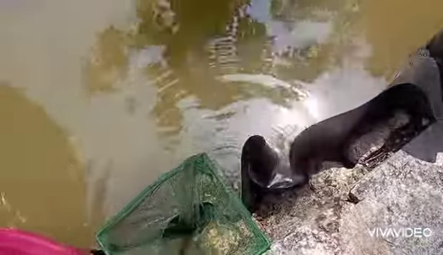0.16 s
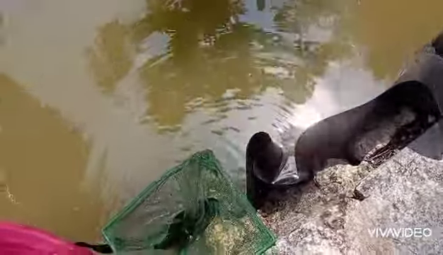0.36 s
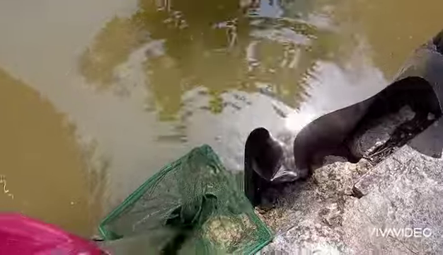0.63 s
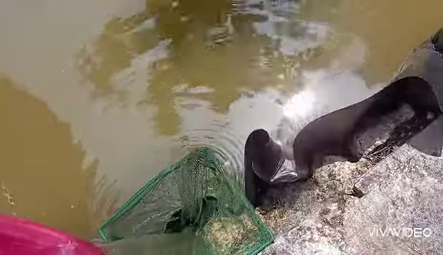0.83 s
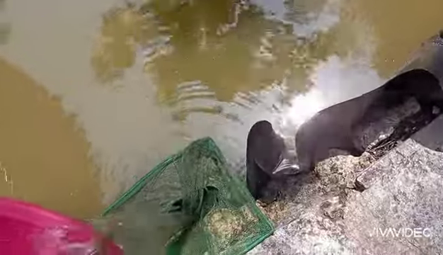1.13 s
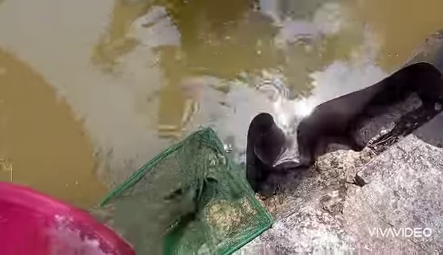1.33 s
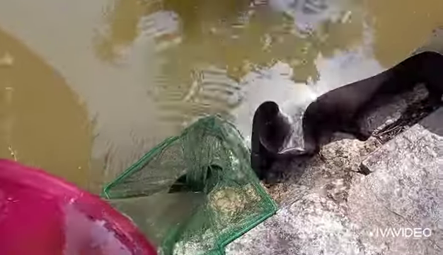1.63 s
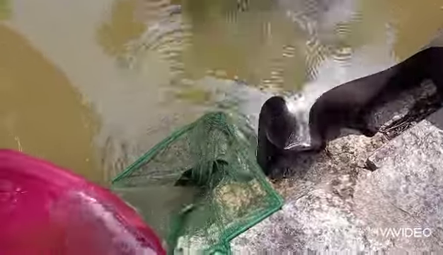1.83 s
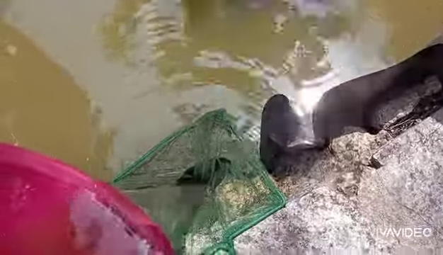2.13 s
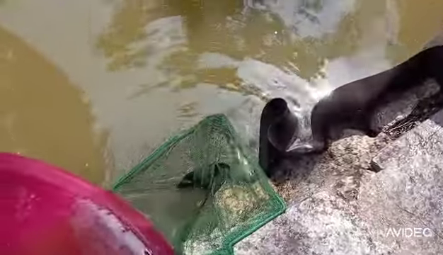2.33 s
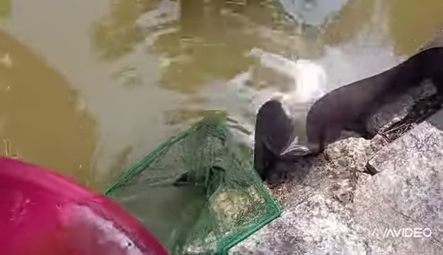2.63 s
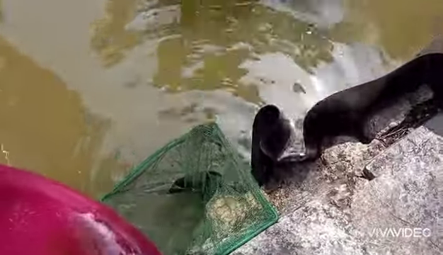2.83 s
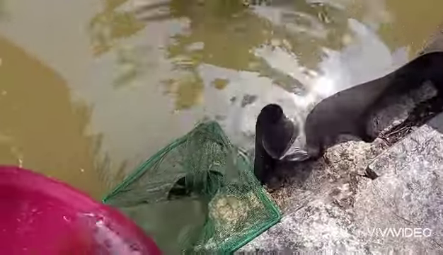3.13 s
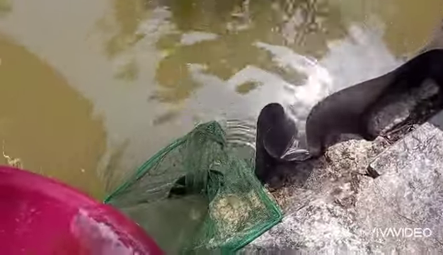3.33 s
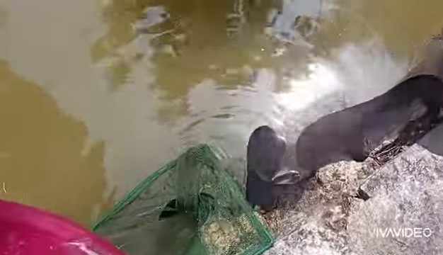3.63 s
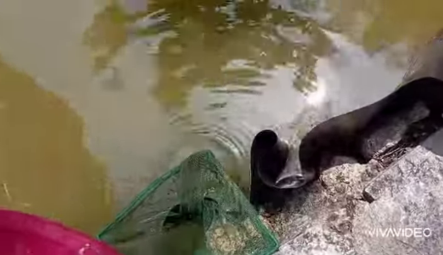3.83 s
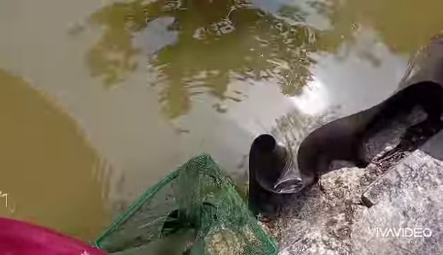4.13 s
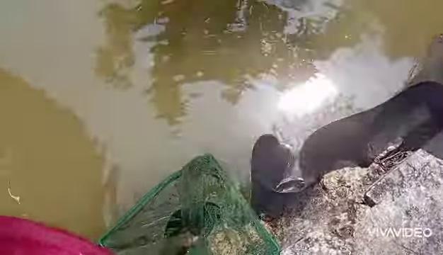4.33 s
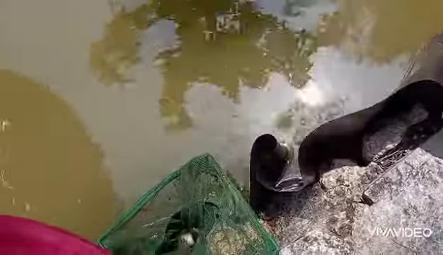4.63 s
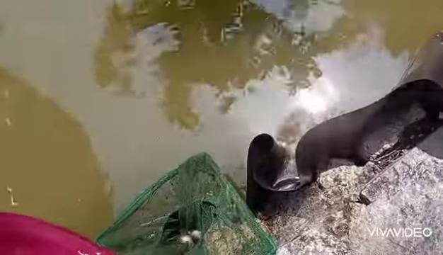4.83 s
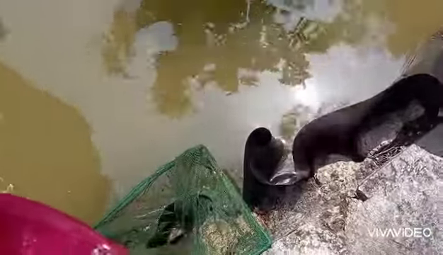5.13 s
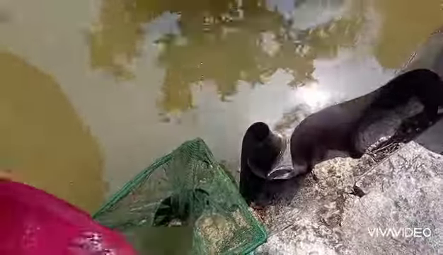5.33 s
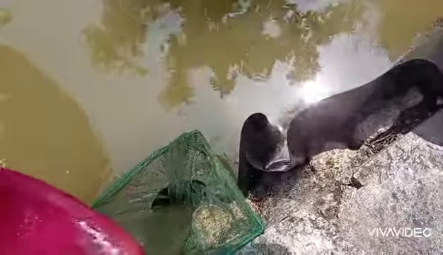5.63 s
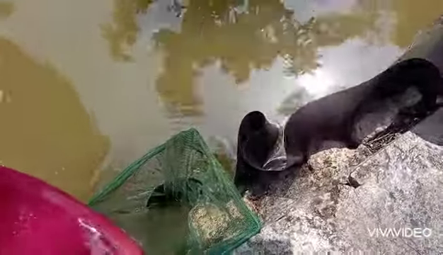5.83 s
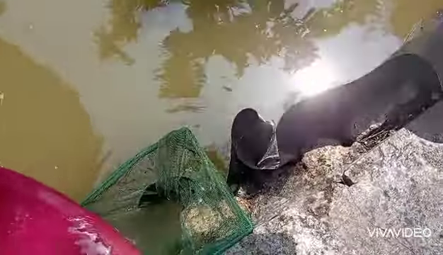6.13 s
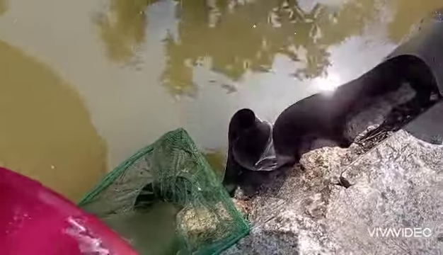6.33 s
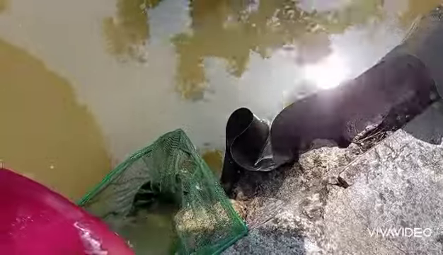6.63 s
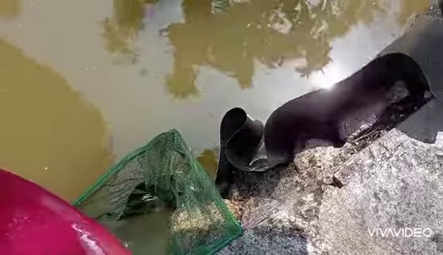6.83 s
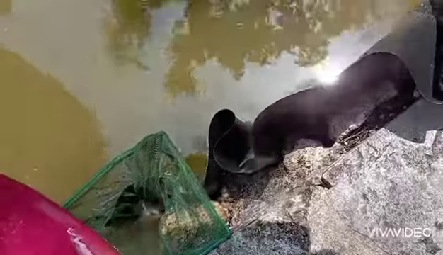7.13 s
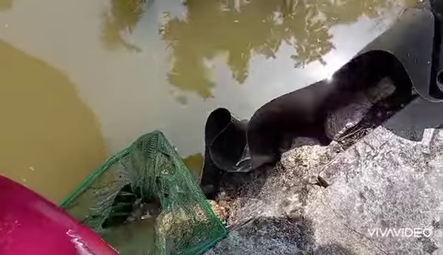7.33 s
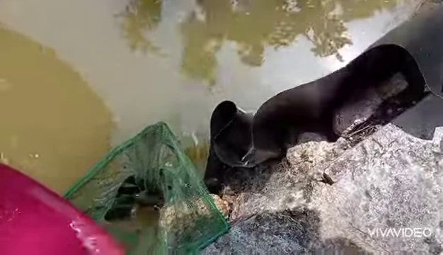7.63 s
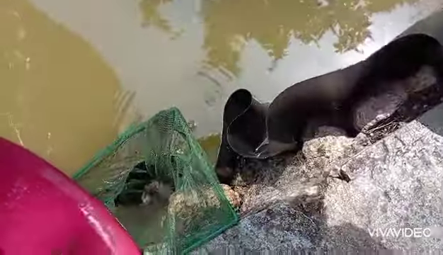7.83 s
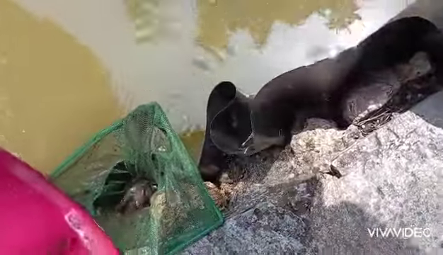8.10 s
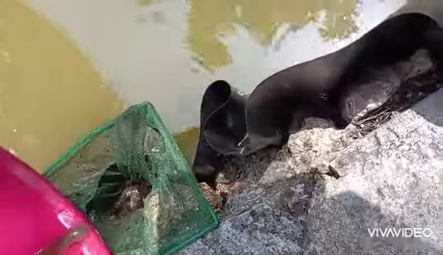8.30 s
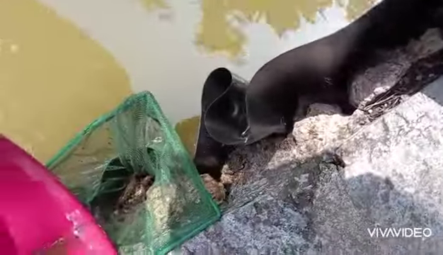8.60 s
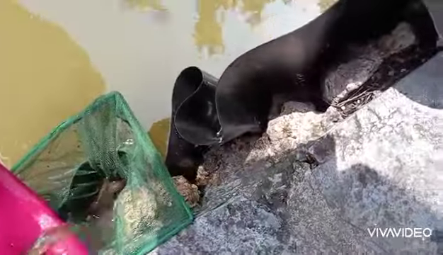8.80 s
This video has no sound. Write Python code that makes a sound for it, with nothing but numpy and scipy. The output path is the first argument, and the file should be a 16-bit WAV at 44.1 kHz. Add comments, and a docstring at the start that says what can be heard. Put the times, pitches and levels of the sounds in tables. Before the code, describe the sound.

A quiet outdoor pond edge, heard close in stereo, with faint steady hiss and low breeze rumble puffing mainly on the left. From 0 s a net slops in shallow water: gurgling, trickling bubbles, fine fizz and plopping drops, while a plastic tub rim rasps faintly until 0.6 s. A sharp tick comes at 0.2 s and a dull, hollow tub knock near 0.77 s. Small spray splashes cluster around 1.3-1.5 s, a wind thump and low glug at 1.66 s, further splashes at 2-2.5 s. From 3 to 6.5 s the water thins to sparse drips, crackly fizz and light ticks, with deep soft glugs around 3.6-3.9 and 4.3 s. Bright, hard clicks with wet plinks snap at 6.8 and 7.25 s amid brief swishes and wind puffs. From 7.9 s small splashes and light tub taps resume, with a crisp knock and splash at 8.45 s and last drops and taps to nearly 9 s.

```python
"""A hand net is worked in the shallow edge of a pond, beside a plastic tub and a stone bank.
Bubbles and spray make the water gurgle, trickle, fizz, glug, swish, spatter and splash; drops plop.
Short rings make the ticks of grit and net frame; the tub's modes knock and its rim rasps.
A light breeze rumbles and puffs, mostly on the left microphone port, over a steady outdoor hiss."""
import sys
import numpy as np
from scipy import signal
from scipy.io import wavfile

SR = 44100
rng = np.random.default_rng(int(sys.argv[2]) if len(sys.argv) > 2 else 0)


def generate_wav(signal):
    """Clip the signal to [-1, 1] and save it as 16-bit WAV at the path in sys.argv[1]."""
    frames = np.transpose(np.atleast_2d(signal))
    scaled = np.clip(frames, -1, 1) * 32767
    pcm = np.round(scaled).astype(np.int16)
    wavfile.write(sys.argv[1], SR, pcm)


N = 395136

# strongest eddies hitting the left port: start_s [s], level_db [dB], nominal pitch_hz [Hz]
WIND_PUFFS = [(0.41, -24, 156), (0.686, -24, 117), (.846, -29, 142), (1.014, -28.5, 119), (1.256, -25, 113),
              (1.665, -16, 138), (1.975, -22, 144), (2.084, -27.5, 110), (2.527, -25.5, 178),
              (2.563, -20.5, 150), (2.688, -25.5, 143), (2.782, -24.5, 142), (4.101, -24.5, 162),
              (4.229, -29.5, 100), (4.872, -27, 184), (4.964, -28.5, 113), (5.013, -32, 167),
              (5.183, -26, 182), (5.197, -30, 191), (6.855, -28.5, 115), (6.984, -28.5, 128),
              (7.052, -27.5, 180), (7.083, -25, 137), (7.118, -23, 140), (7.162, -20, 100),
              (7.461, -30, 167), (7.481, -24, 106), (8.366, -26.5, 135), (8.622, -26.5, 156),
              (8.653, -26, 136), (8.685, -28, 146)]
# sharpest ticks of spray, grit and frame on stone: start_s [s], level_db [dB], pitch_hz [Hz]
STONE_TICKS = [(0.225, -15, 9400), (.258, -42, 10000), (.474, -34, 8450), (.641, -29.5, 6040),
               (.781, -31, 3620), (0.804, -28.5, 7360), (.889, -30, 2800), (.894, -29, 7340),
               (.957, -32, 7650), (1.031, -36, 6800), (1.3182, -27, 8900), (1.379, -29, 6700),
               (1.39, -30, 6000), (1.465, -25, 9800), (1.468, -25, 10400), (2.042, -33, 9300),
               (2.2865, -27, 8700), (2.33, -29, 10300), (2.925, -34, 10200), (3.326, -27, 9150),
               (3.6345, -29.5, 11700), (3.89, -38, 6400), (4.289, -31, 8400), (4.415, -32, 6950),
               (4.554, -30.5, 9700), (5.397, -31.5, 10600), (5.438, -31, 7950), (5.493, -31, 6200),
               (5.532, -24, 9050), (5.934, -30, 7600), (6.1293, -26, 9800), (6.764, -30, 9300),
               (6.8341, -14, 9400), (7.251, -32, 2680), (7.2568, -14.5, 7900), (7.282, -27, 10900),
               (7.404, -26.5, 9800), (7.413, -36, 3620), (7.862, -31, 8100), (7.899, -33.5, 6030),
               (7.97, -33.5, 3100), (8.454, -20, 9100), (8.613, -34, 1810), (8.619, -31, 8700),
               (8.887, -32, 10200)]
# loudest drops: start_s [s], level_db [dB], pitch_hz [Hz]
LOUD_DROPS = [(.085, -37, 2710), (.151, -44, 664), (.166, -36, 660), (.19, -36, 630), (.25, -38, 605),
              (.291, -34, 636), (.336, -36, 1720), (.352, -39, 1540), (.472, -44, 577), (0.544, -41, 2480),
              (.651, -37.5, 3500), (.702, -43, 2180), (.78, -35, 3370), (.795, -30, 3570), (.81, -40, 1880),
              (.899, -35, 3200), (.908, -28.5, 2980), (1.004, -33, 4870), (1.029, -26.5, 766),
              (1.318, -31.5, 844), (1.343, -39, 730), (1.378, -29, 4240), (1.465, -37, 530),
              (1.514, -29, 1730), (1.514, -29.5, 696), (1.553, -43, 705), (1.584, -35.5, 3400),
              (1.768, -40, 1860), (1.98, -44, 708), (2.042, -39.5, 3170), (2.044, -39.5, 730),
              (2.285, -34.5, 753), (2.536, -41, 2840), (2.603, -40.5, 1390), (2.702, -40, 2700),
              (2.903, -43.5, 3160), (2.926, -42, 690), (3.096, -46, 1860), (3.113, -37, 7500),
              (3.16, -46, 1590), (3.365, -47, 1400), (3.39, -44.5, 3270), (3.487, -35, 8330),
              (3.61, -45, 590), (3.709, -47, 1930), (3.778, -46, 495), (3.889, -46, 710),
              (3.956, -42, 3200), (3.992, -40.5, 1530), (4.157, -37, 2830), (4.195, -34.5, 11300),
              (4.261, -43, 2900), (4.314, -40, 737), (4.34, -37, 6490), (4.403, -43, 3320),
              (4.53, -46.5, 727), (4.654, -41, 2450), (4.689, -36, 4100), (4.707, -39, 2860),
              (5.316, -37.5, 7000), (5.439, -40, 1620), (5.544, -44, 1820), (5.968, -32, 2590),
              (6.533, -43.5, 1660), (6.756, -41, 2920), (6.834, -23.5, 5220), (6.9, -32.5, 5330),
              (6.914, -40, 2000), (7.032, -39.5, 2000), (7.226, -43, 1330), (7.285, -40.5, 730),
              (7.287, -43, 1450), (7.391, -35, 4500), (7.508, -36, 4400), (7.531, -32, 4300),
              (7.713, -43, 1540), (7.858, -34, 1860), (8.616, -35.5, 1420), (8.615, -33.5, 4250),
              (8.695, -38, 2770), (8.855, -40, 1970)]
# blows on the tub: start_s [s], strength_db [dB], contact_brightness_hz [Hz]
TUB_KNOCKS = [(0.733, -30, 477), (0.77, -22, 109), (7.865, -39.5, 600), (7.883, -35, 1100),
              (7.995, -42.5, 700), (8.281, -36.5, 696), (8.4555, -20, 2840), (8.613, -45, 2000),
              (8.776, -33, 327), (8.856, -36, 504)]
# ringing modes of the tub: pitch_hz [Hz], level_db [dB], t60_s [s]
TUB_MODES = [(220.6, -11, 0.2), (246, -0.5, 0.076), (293, 1, .04), (530, -23.5, .04), (720, -15, 0.047),
             (1165, -19.5, .03), (2590, -9.5, 0.015)]
# level of the tub dragged on stone: time_s [s], level_db [dB]
TUB_DRAG = [(0, -54), (.07, -68.5), (.09, -50), (.2, -53.5), (.33, -53), (.4, -58.5), (.55, -57),
            (.65, -110)]
# resonances of the dragged rim: pitch_hz [Hz], relative level_db [dB], t60_s [s]
RIM_MODES = [(218, -9, 0.026), (283, 6.5, 0.033), (715, 4, 0.019)]
# relative strength of bubbles by pitch, large to small: pitch_hz [Hz], level_db [dB]
GURGLE_BUBBLES = [(330, -20), (480, -6), (690, 7.5), (850, 1.5), (1150, -7)]
TRICKLE_BUBBLES = [(1150, -5.5), (1800, -2), (2800, 4), (3600, 3), (5200, -1.5)]
FIZZ_BUBBLES = [(4200, -0.5), (5500, -3.5), (7000, -1.5), (9300, 2), (11000, 0.5), (13000, -2.5),
                (15500, -1.5)]
# outdoor hiss: frequency_hz [Hz], relative density_db [dB per Hz]
AIR_SPECTRUM = [(40, -14), (76, 2), (123, -2.5), (170, -4.5), (300, -12.5), (480, -19), (740, -22),
                (1160, -28.5), (2000, -22.5), (3400, -22.5), (4700, -12.5), (6200, -19), (10400, -21),
                (12500, -41), (15500, -39)]
# likeness of the hiss at the two ports: frequency_hz [Hz], correlation [-1 to 1]
PORT_LIKENESS = [(300, 0.97), (1000, 0), (2500, 0.15), (5000, 0)]
# water slopped by each move of the net: start_s [s], length_s [s], trickle_db [dB],
# gurgle_above_trickle_db [dB], fizz_above_trickle_db [dB]
NET_SLOPS = [(0.02, .3, -55, -6.5, 0), (0.399, .09, -58, -0.5, 4), (0.617, .13, -58, -1.5, 2.5),
             (0.74, .28, -57.5, -5.5, 3), (1.171, .18, -58, 0, 0.5), (1.344, .25, -56, -0.5, 2.5),
             (1.656, .68, -60, -3, 0.5), (2.369, .31, -60, -8, -0.5), (2.884, .15, -68, 3, -0.5),
             (3.082, .3, -67, -12, 7.5), (3.59, 0.33, -69.5, -4.5, 4.5), (3.926, .12, -64, -10, 1),
             (4.245, .21, -66, -20, 11), (4.486, 0.092, -60, -26, 7), (4.618, .1, -61, -29.5, 3.5),
             (4.777, 0.15, -62.5, 2.5, 1), (5.068, .28, -64, -9, 4.5), (5.409, .1, -58, -21, 0),
             (5.62, .13, -60.5, -9.5, -1.5), (5.913, .24, -66.5, -4, 1.5), (6.477, 0.2, -63.5, -5, 1),
             (6.708, .21, -62, -0.5, 2.5), (7.23, .18, -59, -7.5, 0.5), (7.472, .12, -63.5, -16, 0.5),
             (7.734, .09, -59.5, -11, -2.5), (7.851, .14, -60, -9.5, 0), (8.604, .3, -70, 1.5, 2.5)]
# gusts of the breeze: start_s [s], length_s [s], level_db [dB]
BREEZE_GUSTS = [(.02, 0.41, -47), (.62, 0.26, -40), (1.17, 0.072, -39.5), (1.47, 0.49, -40),
                (1.96, 0.15, -38.5), (2.5, 0.17, -35), (3.51, 0.14, -37), (3.81, 0.079, -37),
                (3.99, .04, -37), (4.8, 0.23, -43.5), (5.1, .16, -42), (5.7, 0.2, -46.5),
                (5.96, 0.087, -41.5), (6.2, 0.06, -43), (6.72, 0.13, -44.5), (7.05, .16, -36),
                (7.4, 0.15, -44), (8.22, 0.056, -40), (8.5, 0.21, -44), (8.76, 0.12, -39.5)]
# trickle draining from the mesh between slops: time_s [s], level_db [dB]
MESH_DRAIN = [(0, -64), (3, -71), (7.8, -69.5), (8.15, -84.5)]
# water swept through the mesh: start_s [s], length_s [s], level_db [dB], centre_hz [Hz]
MESH_SWISHES = [(0.229, 0.044, -55.5, 2690), (0.979, 0.069, -54, 1100), (1.449, 0.16, -60, 1920),
                (1.692, .14, -64.5, 1970), (2.234, 0.11, -69, 2840), (4.798, 0.089, -60, 1660),
                (6.748, 0.035, -54.5, 2800), (6.851, 0.13, -59.5, 1780), (7.385, 0.04, -58, 2350)]
# sudden splashes of spray: start_s [s], level_db [dB], centre_hz [Hz], t60_s [s]
SPRAY_SPLASHES = [(.473, -60, 4500, 0.044), (0.796, -41, 4960, 0.035), (0.891, -51, 3060, 0.08),
                  (1.319, -41, 3600, 0.026), (1.436, -41, 5000, 0.044), (1.46, -38.5, 4200, 0.044),
                  (1.98, -42, 3820, 0.033), (2.284, -49, 3200, 0.037), (2.529, -41.5, 4300, 0.055),
                  (3.122, -46, 2960, 0.063), (3.888, -50, 2700, 0.075), (7.252, -44, 2730, 0.09),
                  (7.86, -40.5, 5400, 0.052), (7.971, -41, 4830, 0.026), (8.04, -47, 7500, 0.086),
                  (8.318, -45, 8500, .05), (8.443, -48, 2300, .04), (8.455, -40, 5500, .02),
                  (8.459, -39.5, 1000, 0.036), (8.5, -46, 10500, .025), (8.619, -39.5, 5500, 0.033),
                  (8.62, -48, 2000, 0.055)]
# large pockets of air gulping free: start_s [s], level_db [dB], pitch_hz [Hz]
AIR_GLUGS = [(.079, -31.5, 312), (.098, -45, 340), (0.123, -35.5, 312), (0.148, -45, 323), (.734, -26, 330),
             (1.656, -22, 245), (1.659, -41, 399), (3.612, -35, 190), (3.82, -27.5, 150),
             (3.838, -34.5, 259), (3.876, -24.5, 156), (4.342, -27.5, 125), (4.811, -43, 282),
             (5.184, -40, 260)]

AIR_DB, CUTOFF_HZ = -54, 15800
SLOP_ATTACK_S, SLOP_T60_S = .035, 0.49
GUST_ATTACK_S, GUST_T60_S, CALM_DB = .015, .27, -52.5
DRAIN_GURGLE_DB, DRAIN_FIZZ_DB = -5.5, 2  # above the draining trickle
GLUG_T60_S, GLUG_RISE = 0.068, 0.066
TICK_LEFT_DB = -3.5  # the ticks lie a little to the right


def from_db(db):
    """Decibels to amplitude gain."""
    return 10 ** (np.asarray(db) / 20)


def decay(t, t60):
    """Exponential fall of 60 dB in t60 seconds."""
    return np.exp(-np.log(1000) * t / t60)


def rms_one(x):
    """Scale so that the mean of the channels has rms 1."""
    return x / np.sqrt(np.mean(np.atleast_2d(x).mean(axis=0) ** 2) + 1e-20)


def in_time(rows):
    """Interpolate each column of a curve at every sample."""
    s, *columns = np.transpose(rows)
    return [np.interp(np.arange(N) / SR, s, c) for c in columns]


def at_hz(points, hz):
    """Read a spectrum on a log-frequency axis."""
    frequency_hz, value = np.array(points).T
    return np.interp(np.log(hz), np.log(frequency_hz), value)


def filtered(x, hz, kind, order=2):
    """Causal Butterworth filter."""
    sos = signal.butter(order, np.clip(hz, 10, .47 * SR), kind, fs=SR, output="sos")
    return signal.sosfilt(sos, x + 1e-18)


def drift(rate_hz):
    """Slow random wander of rms 1: noise through a double pole at rate_hz, on every 40th sample."""
    r = np.exp(-80 * np.pi * rate_hz / SR)
    noise = rng.standard_normal(N // 40 + 2002)
    slow = signal.lfilter([1], [1, -2 * r, r * r], noise)[2000:]  # skip the filter's start
    return np.interp(np.arange(N) / 40, np.arange(len(slow)), rms_one(slow))


def ring(clicks, hz, t60):
    """A resonator: a unit click starts a decaying sine of about height 1."""
    r = decay(1, t60 * SR)
    w = 2 * np.pi * min(hz, SR / 2 - 1000) / SR
    return signal.lfilter([0, np.sin(w)], [1, -2 * r * np.cos(w), r * r], clicks + 1e-18)


def add(track, s, sound):
    """Mix a short sound in at time s."""
    i = max(round(s * SR), 0)
    track[..., i:i + sound.shape[-1]] += sound[..., :N - i]


def panned(left_db):
    """Left and right gains for a level difference."""
    return from_db(np.array([[left_db], [-left_db]]) / 2)


def placed(sound, left_db, lag_samples):
    """Each port hears its own level; a positive lag delays the right port by fractions of a sample or more."""
    taps = np.arange(-6, 7)
    delay = np.sinc(taps - lag_samples) * np.hanning(len(taps) + 2)[1:-1]
    late = np.convolve(sound, delay)[np.arange(len(sound)) + len(taps) // 2]
    return np.array([sound, late]) * panned(left_db)


def bank(x, wet_db, t60):
    """Stones, pipe and tub scatter a short cloud of echoes, different at each port."""
    t = np.arange(SR // 8) / SR
    cloud = rng.standard_normal((2, len(t))) * decay(t, t60) * (t > .0006)
    cloud /= np.sqrt(np.sum(cloud ** 2, axis=1, keepdims=True))
    echoes = signal.fftconvolve(x * np.ones((2, 1)), cloud, axes=1)[:, :N]
    return x + from_db(wet_db) * echoes


def swells(rows, attack_s, t60, rest_db):
    """Level in dB of events (start_s, length_s, level_db) that rise, hold and die away over a resting level."""
    t = np.arange(0, N, 64) / SR
    power = np.zeros(len(t))
    for s, length, level_db in rows:
        rise = np.clip((t - s) / attack_s, 0, 1)
        fall = decay(np.maximum(t - s - length, 0), t60)
        power += (from_db(level_db) * rise * fall) ** 2
    return 10 * np.log10(np.interp(np.arange(N) / SR, t, power) + from_db(rest_db) ** 2)


def strays(drive_db, top_db, follows, low_hz, high_hz, count, spread_db=6.0):
    """Small chance events (start_s, level_db, pitch_hz), more frequent and stronger where their drive is high."""
    when, size, pitch = rng.random((count, 3)).T
    below_db = drive_db - drive_db.max()
    tally = np.cumsum(from_db(below_db / 2))
    at = np.searchsorted(tally, tally[-1] * (np.arange(count) + when) / count)
    level_db = top_db + follows * below_db[at] + spread_db * (2 * size - 1)
    return list(zip(at / SR, level_db, low_hz * (high_hz / low_hz) ** pitch))


def banded_noise(spectrum, count=22):
    """Stereo noise in bands, alike at the two ports in the bass and nearly unrelated above."""
    out, edges = 0, np.geomspace(35, 16000, count + 1)
    white = rng.standard_normal((2, 2, N))
    for k, (low, high) in enumerate(zip(edges, edges[1:])):
        mid, side = filtered(white[k % 2], [low, high], "band")
        hz = np.sqrt(low * high)
        alike = np.clip(at_hz(PORT_LIKENESS, hz), -1, 1)
        band = np.sqrt(1 + alike) * mid + np.sqrt(1 - alike) * side * [[1], [-1]]
        out = out + from_db(at_hz(spectrum, hz)) * band
    return rms_one(out)


def air():
    """Steady outdoor hiss: banded noise, with a broad microphone resonance in the treble."""
    resonance = rms_one(filtered(rng.standard_normal((2, N)), [4080, 5000], "band", order=3))
    return from_db(AIR_DB) * banded_noise(AIR_SPECTRUM) + from_db(-65.5) * resonance


def tub(give_s=0.00338, rebound_s=.016, rebound_db=-11, slap_db=-13, slap_t60=0.05, judder_db=4):
    """Knocks ring the plastic tub and rebound once; its big low modes swing in late. Dragging it rasps."""
    blows, click = np.zeros(N), signal.unit_impulse(SR // 20)
    for s, strength_db, brightness_hz in TUB_KNOCKS:
        blow = from_db(strength_db) * filtered(click, brightness_hz, "low")
        add(blows, s, blow)
        add(blows, s + rebound_s, from_db(rebound_db) * filtered(blow, 530, "low"))
    body = np.zeros(N)
    for hz, level_db, t60 in TUB_MODES:
        late_s = give_s * TUB_MODES[0][0] / hz
        add(body, late_s, from_db(level_db) * ring(blows, hz, t60))
    # the many short modes of the thin wall merge into a slap, roughened as the rim judders
    t = np.arange(len(click)) / SR
    wall = filtered(rng.standard_normal(len(t)), [330, 3000], "band")
    wall = rms_one(filtered(wall, 1000, "low", order=1))
    wall = rms_one(wall * from_db(judder_db * drift(130)[:len(t)]))
    body += from_db(slap_db) * signal.fftconvolve(blows, wall * decay(t, slap_t60))[:N]
    # the small wall radiates little bass
    knocks = bank(filtered(body, 190, "high", order=3), wet_db=-4.5, t60=0.083)
    # random slips of the rim on stone excite its resonances
    slips = (rng.random(N) < 900 / SR) * rng.standard_normal(N)
    rasp = rms_one(sum(from_db(level_db) * ring(slips, hz, t60) for hz, level_db, t60 in RIM_MODES))
    return knocks + rasp * from_db(in_time(TUB_DRAG)[0])


def flow():
    """Levels of gurgle, trickle and fizz: all three swell with each slop and drain away after it."""
    s, length, slop_db, gurgle_db, fizz_db = np.transpose(NET_SLOPS)
    drain_db, = in_time(MESH_DRAIN)
    gurgle = slop_db + gurgle_db, drain_db + DRAIN_GURGLE_DB
    trickle = slop_db, drain_db
    fizz = slop_db + fizz_db, drain_db + DRAIN_FIZZ_DB
    return [swells(zip(s, length, level_db), SLOP_ATTACK_S, SLOP_T60_S, rest_db)
            for level_db, rest_db in (gurgle, trickle, fizz)]


def bubble(hz, t60, rise, swell=1.0):
    """A bubble swells within a cycle or so, rings down and rises in pitch as it nears the surface."""
    t = np.arange(int(t60 * SR) + 2) / SR
    turns = hz * (t + rise * t * t / (2 * t60))
    return np.sin(2 * np.pi * turns) * (1 - np.exp(-turns / swell)) * decay(t, t60)


def bubbles(spectrum, level_db, bursts, per_s, t60, spread_db, pan_db, rise=0.12, crowding=.45,
            lag_samples=2.44, scatter=0.815, wander=.2, wander_hz=9):
    """Bubbles are born in bursts, more of them when the water is louder; the small high ones die sooner."""
    low, high = spectrum[0][0], spectrum[-1][0]
    stir = from_db(crowding * (level_db - level_db.max()))
    at = np.flatnonzero(rng.random(N) < per_s * stir * bursts / SR)
    size, pitch, side, sign, life = rng.random((5, N))[:, at]
    # bubbles born together are of similar size, so the pitch of the water wanders
    position = (scatter * (pitch - .5) + wander * drift(wander_hz)[at] + .5) % 1
    hz = low * (high / low) ** position
    size_db = spread_db * np.minimum(-np.log(1 - size), 3)
    height = from_db(size_db + at_hz(spectrum, hz)) * np.sign(sign - .5) / np.sqrt(stir[at])
    rings = t60 * np.sqrt(low / hz) * 2 ** (2 * life - 1)
    out = np.zeros((2, N))
    for i, f, h, ring_s, place in zip(at, hz, height, rings, 2 * side - 1):
        add(out, i / SR, placed(h * bubble(f, ring_s, rise), pan_db * place, lag_samples * place))
    return rms_one(out) * from_db(level_db)


def spatter(level_db, bursts, per_s=500, spread_db=5, low_hz=900, high_hz=5500):
    """Water falling from the mesh strikes the pond in separate, unpitched taps of very uneven size."""
    chance = per_s * from_db((level_db - level_db.max()) / 2) * bursts / SR
    at = np.flatnonzero(rng.random(N) < chance)
    size, side, sign = rng.random((3, N))[:, at]
    size_db = spread_db * np.minimum(-np.log(1 - size), 3)
    height = from_db(size_db + level_db[at]) * np.sign(sign - .5)
    taps = np.zeros((2, N))
    taps[:, at] = height * np.sqrt([side, 1 - side])
    return rms_one(filtered(taps, [low_hz, high_hz], "band")) * np.sqrt(np.mean(from_db(level_db) ** 2))


def water(gurgle_db, trickle_db, fizz_db, burst_db=4.5, spatter_db=-7.5):
    """Slopping water frees bursts of bubbles: large ones gurgle, smaller ones trickle, the smallest fizz."""
    bursts = from_db(burst_db * np.minimum(drift(70), 2))
    bursts /= bursts.mean()
    gurgle = bubbles(GURGLE_BUBBLES, gurgle_db, bursts, per_s=400, t60=0.026, spread_db=3.5, pan_db=4)
    trickle = bubbles(TRICKLE_BUBBLES, trickle_db, bursts, per_s=900, t60=0.017, spread_db=3.5, pan_db=13.5)
    # the finest spray crackles in briefer spurts
    spurts = bursts ** .44 * from_db(4 * np.minimum(drift(140), 2))
    spurts /= spurts.mean()
    fizz = bubbles(FIZZ_BUBBLES, fizz_db, spurts, per_s=1100, t60=0.003, spread_db=2.5, pan_db=11.5)
    taps = spatter(trickle_db + spatter_db, bursts)
    return bank(gurgle + trickle + taps, wet_db=-1.5, t60=0.11) + bank(fizz, wet_db=-1.0, t60=0.063)


def dip(cycles):
    """A brief fall in pressure with a swell on each side; time is counted in cycles."""
    return -np.cos(2 * np.pi * cycles) * np.exp(-2 * cycles ** 2)


def breeze(right_db=-24, edge_db=-11, edge_ratio=1.75, flutter_db=-12):
    """Eddies press on the left port: lumpy rumble, and single puffs as one sharp dip between two swells."""
    rumble = filtered(rng.standard_normal((2, N)), [66, 150], "band")
    rumble = filtered(rumble, 173, "low", order=1)
    flutter = filtered(rng.standard_normal((2, N)), [165, 345], "band", order=3)
    lumps = rms_one(from_db(6.9 * np.minimum(drift(22), 1.1)))
    # the stronger lumps are also the brighter ones
    bright = from_db(flutter_db) * flutter / flutter.std() * rms_one(lumps ** 1.9)
    wind_db = swells(BREEZE_GUSTS, GUST_ATTACK_S, GUST_T60_S, CALM_DB)
    out = (rumble / rumble.std() * lumps + bright) * from_db(wind_db)
    t = np.arange(-(SR // 50), SR // 50) / SR
    for s, level_db, hz in WIND_PUFFS:
        puff = dip(hz * t * 0.93) + from_db(edge_db) * dip(hz * t * edge_ratio)
        add(out[0], s + t[0], from_db(level_db) * puff)
    return out * from_db([[0], [right_db]])


def glugs():
    """A large pocket of air rings low and long as it escapes from under the net."""
    out = np.zeros((2, N))
    for s, level_db, hz in AIR_GLUGS:
        add(out, s, from_db(level_db) * bubble(hz, GLUG_T60_S, GLUG_RISE))
    return bank(out, wet_db=-7.5, t60=0.09)


def drops(trickle_db, t60_at_1khz=0.023, rise=0.086, splat_db=-18.0206, splat_t60_at_1khz=0.051,
          tap_db=-7, tap_hz=5000):
    """Each drop taps the surface and rings one bubble inside a faint, brief splat."""
    out, t = np.zeros((2, N)), np.arange(SR // 20) / SR
    tap = filtered(signal.unit_impulse(len(t)), [1000, tap_hz], "band", order=1)
    tap *= from_db(tap_db) / np.abs(tap).max()
    plinks = strays(trickle_db, top_db=-45, follows=.4, low_hz=900, high_hz=3600, count=50)
    for s, level_db, hz in LOUD_DROPS + plinks:
        brevity = np.sqrt(1000 / hz)  # small drops die sooner
        splat = rms_one(filtered(rng.standard_normal(len(t)), [hz * 0.54, hz * 1.48], "band"))
        splat *= decay(t, splat_t60_at_1khz * brevity) * from_db(splat_db)
        gain = from_db(level_db) * panned(rng.normal(0, 5.6))
        add(out, s, gain * bubble(hz, t60_at_1khz * brevity, rise))
        add(out, s, gain * (splat + tap))
    return bank(out, wet_db=-6, t60=.04)


def ticks(fizz_db, cycles=8, width=0.58, crack_db=-17, lag_samples=0.6, echo_s=.0025, echo_db=-12):
    """A hard contact rings a few cycles over a duller crack; the stone throws it back once."""
    out, click = np.zeros((2, N)), signal.unit_impulse(SR // 100)
    grit = strays(fizz_db, top_db=-33, follows=.35, low_hz=6000, high_hz=11500, count=18)
    for s, level_db, hz in STONE_TICKS + grit:
        band = [hz / (1 + width), min(hz * (1 + width), 11500)]
        tick = filtered(ring(click, hz, cycles / hz), band, "band")
        crack = from_db(crack_db) * ring(click, hz * .5, cycles / hz)
        contact = tick / np.abs(tick).max() + crack
        heard = placed(from_db(level_db) * contact, TICK_LEFT_DB, lag_samples)
        add(out, s, heard)
        add(out, s + echo_s * rng.uniform(.85, 1.15), from_db(echo_db) * heard)
    near = bank(out, wet_db=-4, t60=.014)
    return bank(near, wet_db=-7, t60=.066)


def swishes(per_s=4000, cycles=9, spread_octaves=0.3, glide_octaves=0.49):
    """The mesh shears water into a swarm of tiny bubbles that swells and fades, climbing in pitch."""
    out = np.zeros((2, N))
    for s, length, level_db, centre_hz in MESH_SWISHES:
        swarm = np.zeros(N)
        when, pitch, sign = rng.random((int(per_s * length), 3)).T
        octaves = spread_octaves * np.sqrt(3) * (2 * pitch - 1) + glide_octaves * (when - .5)
        heights = np.sin(np.pi * when) ** .5 * np.sign(sign - .5)
        for part, hz, height in zip(when, centre_hz * 2 ** octaves, heights):
            add(swarm, s + part * length, height * bubble(hz, cycles / hz, rise=0.11))
        stroke_rms = np.sqrt(np.sum(swarm ** 2) / (length * SR))
        out += from_db(level_db) * swarm / stroke_rms
    return bank(out, wet_db=-7, t60=0.056)


def spray(t, hz, width, per_s):
    """A dense shower of droplets too small to have a pitch of their own; rms 1."""
    droplets = rng.standard_normal(len(t)) * (rng.random(len(t)) < per_s / SR)
    return rms_one(filtered(droplets, [hz / (1 + width), min(hz * (1 + width), 15000)], "band"))


def splashes(attack_s=0.0014, width=1.0, per_s=9000):
    """Water slapped into spray: a sharp start and a short wet tail."""
    out, t = np.zeros((2, N)), np.arange(SR // 10) / SR
    for s, level_db, hz, t60 in SPRAY_SPLASHES:
        shape = np.minimum(t / attack_s, 1) * decay(t, t60)
        add(out, s, from_db(level_db) * shape * spray(t, hz, width, per_s))
    return bank(out, wet_db=-3.0, t60=0.064)


def scene():
    """Everything at the pond's edge; the slops drive the bubbles and shake loose drops and grit."""
    gurgle_db, trickle_db, fizz_db = flow()
    pond = water(gurgle_db, trickle_db, fizz_db) + glugs() + drops(trickle_db) + swishes() + splashes()
    return air() + tub() + pond + breeze() + ticks(fizz_db)


def record(dry):
    """The deepest bass and the top are cut."""
    bass_cut = filtered(dry, 42, "high", order=3)
    top_cut = signal.ellip(10, .2, 70, CUTOFF_HZ, fs=SR, output="sos")
    return signal.sosfilt(top_cut, bass_cut)


dry = scene()
out = record(dry)
generate_wav(out)
```